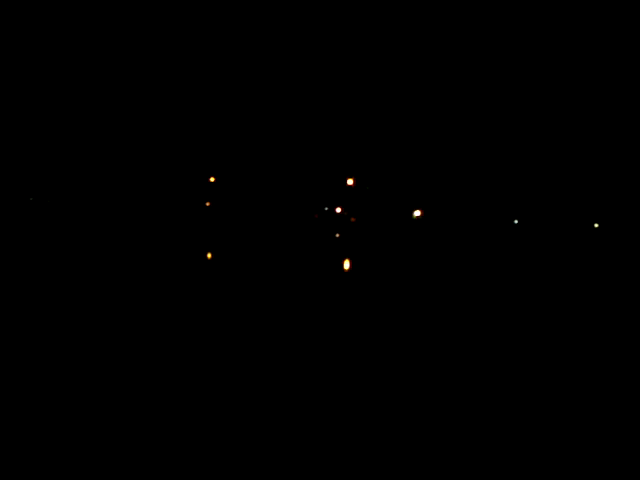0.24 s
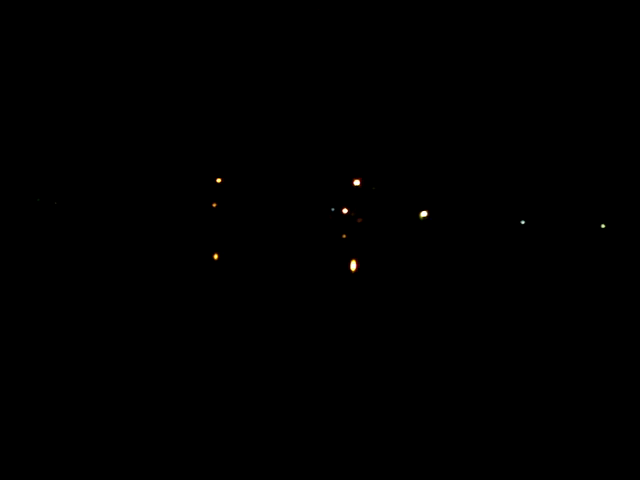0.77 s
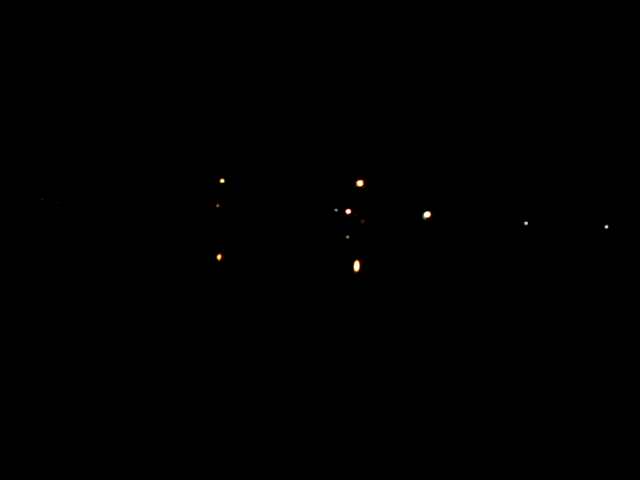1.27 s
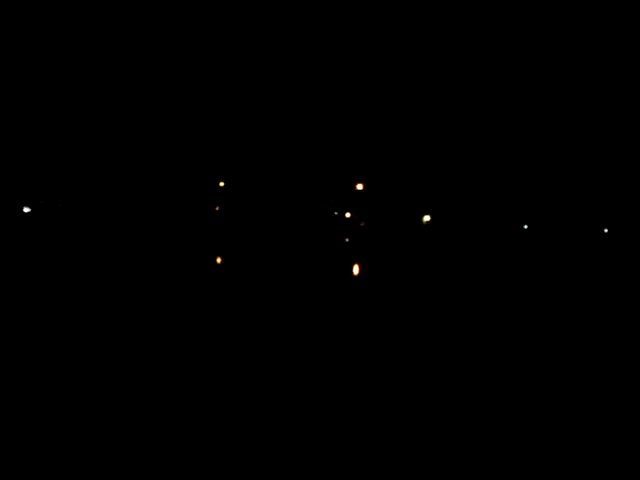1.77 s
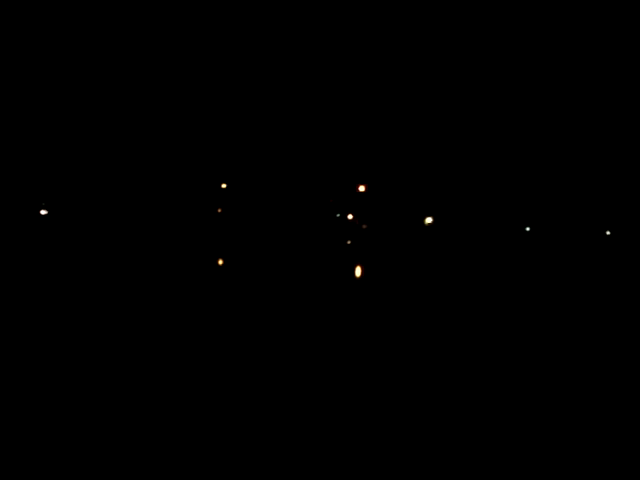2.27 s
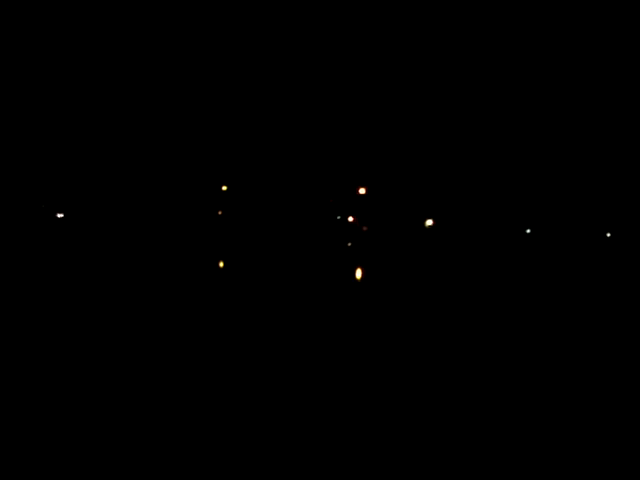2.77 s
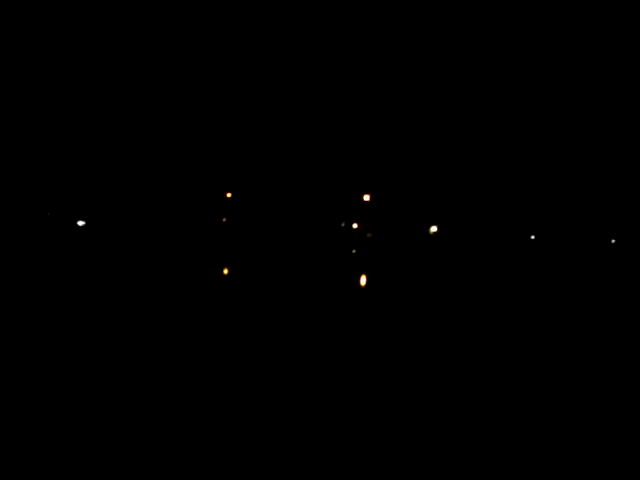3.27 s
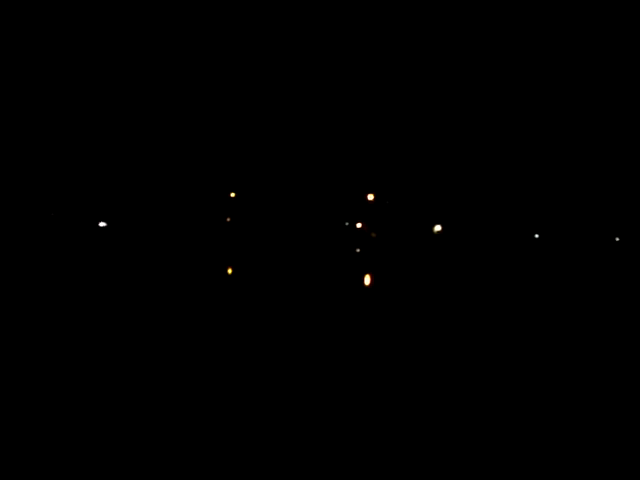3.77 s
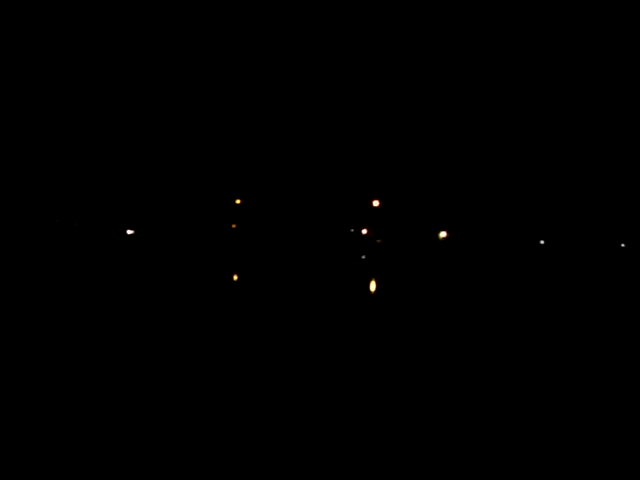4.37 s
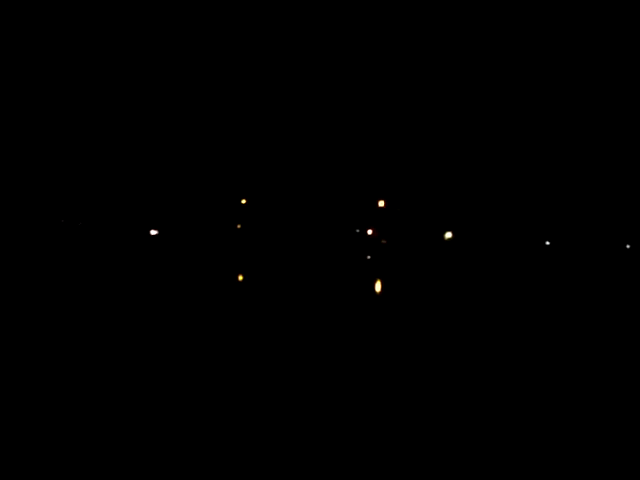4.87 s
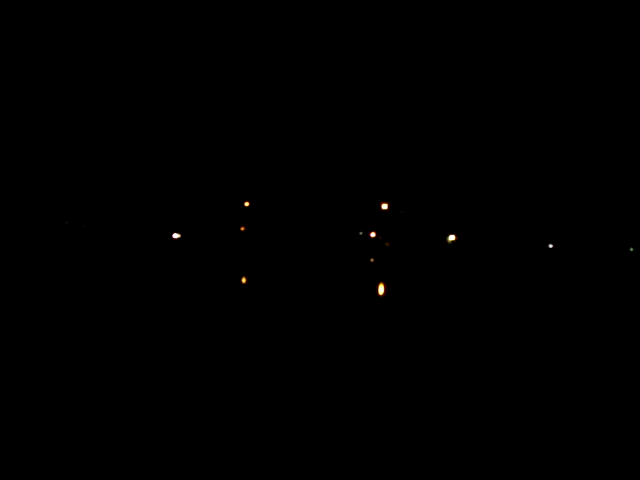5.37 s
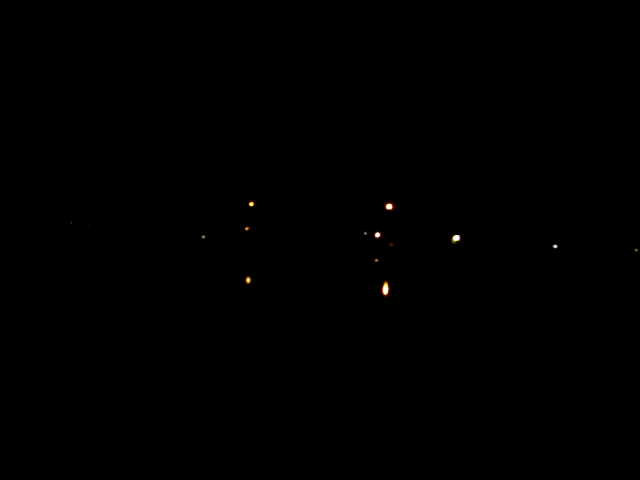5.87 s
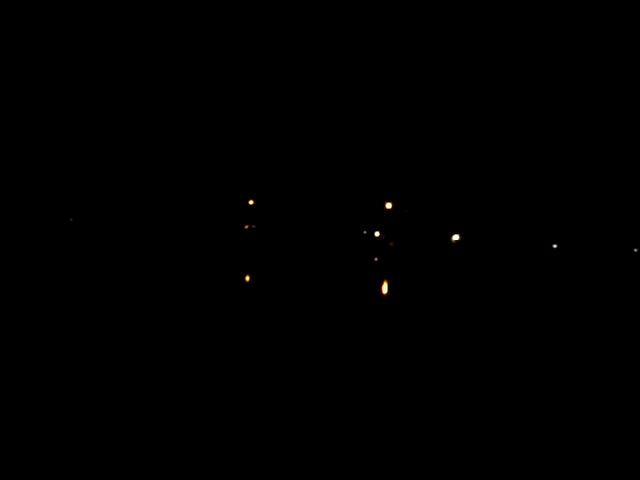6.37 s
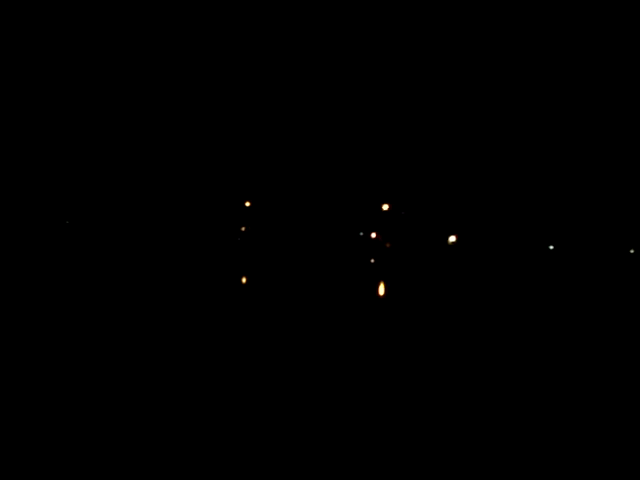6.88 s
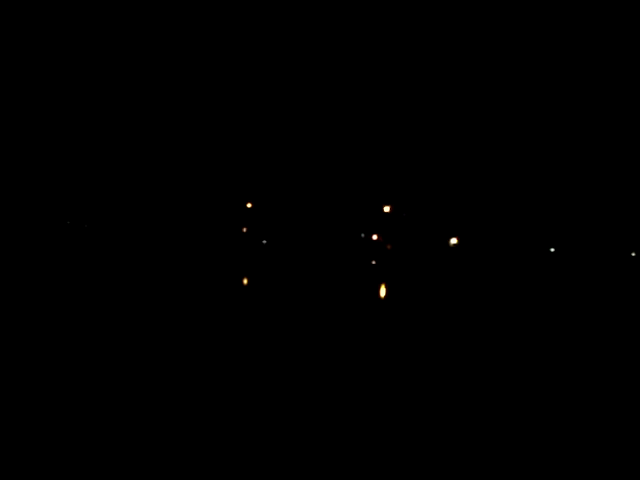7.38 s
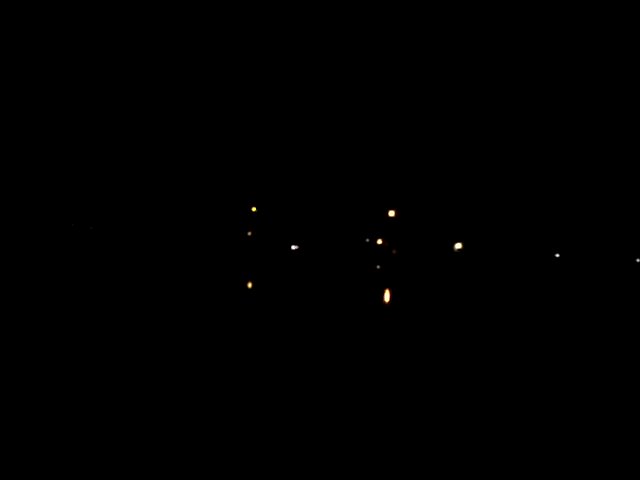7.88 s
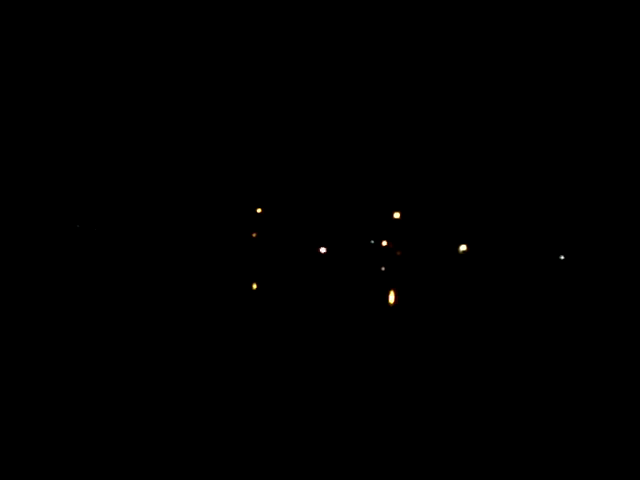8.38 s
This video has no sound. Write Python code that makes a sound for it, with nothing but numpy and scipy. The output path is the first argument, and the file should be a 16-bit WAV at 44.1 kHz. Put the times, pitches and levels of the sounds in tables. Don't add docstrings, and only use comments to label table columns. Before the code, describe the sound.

A dense, steady frog chorus from start to end. Two near callers repeat short, raspy, upward-bending quacks in separate rhythms; the right one pauses briefly after the middle, then resumes. Irregular bouts of lower, ringing pond frog chuckles fill the gaps. Many distant frogs shimmer in open-air scatter. Faint low car hum, tiny puffs of air and microphone hiss lie far beneath.

```python
import sys
import numpy as np
from scipy import signal
from scipy.fft import rfft, irfft
from scipy.io import wavfile
from scipy.ndimage import uniform_filter1d

SR = 44100
rng = np.random.default_rng(int(sys.argv[2]) if len(sys.argv) > 2 else 0)


def natural_amplitude(level_db):
    exponent = np.asarray(level_db, float) / 20
    return 10 ** exponent


def to_wav(s):
    ch = np.atleast_2d(s).T
    pcm = np.round(np.clip(ch, -1, 1) * 32767)
    wavfile.write(sys.argv[1], SR, pcm.astype(np.int16))


N = 381024

# (first pulse [s], pulse rate [Hz], pulses [count])
CALLS_AHEAD = [(0.1554, 202, 18), (0.4236, 210, 17), (0.7097, 211, 19), (1.1776, 198, 19),
               (1.4612, 208, 19), (1.7748, 205, 19), (2.0427, 212, 16), (2.3184, 210, 16),
               (2.5888, 207, 18), (2.8651, 207, 16), (3.1475, 211, 16), (3.4131, 205, 19),
               (3.7121, 202, 18), (3.9902, 207, 18), (4.2618, 206, 17), (4.5408, 209, 19), (4.846, 206, 19),
               (5.1381, 202, 16), (5.4697, 197, 18), (5.7727, 207, 18), (6.0527, 200, 19),
               (6.3265, 200, 19), (6.6182, 201, 16), (6.9093, 206, 18), (7.1811, 204, 19),
               (7.4693, 202, 18), (7.7521, 201, 17), (8.0358, 197, 19), (8.3387, 201, 16)]
CALLS_RIGHT = [(0.0208, 189, 16), (0.3172, 189, 18), (0.6034, 187, 15), (0.8842, 185, 15),
               (1.1546, 183, 16), (1.4258, 181, 15), (1.7382, 189, 17), (2.0382, 183, 16), (2.328, 181, 15),
               (2.625, 185, 16), (2.895, 181, 16), (3.1842, 183, 16), (3.4542, 181, 16), (3.7382, 183, 15),
               (4.0058, 177, 16), (4.3106, 185, 15), (4.5914, 179, 16), (4.8918, 179, 15),
               (5.1742, 179, 15), (5.459, 179, 15), (5.7934, 181, 17), (6.6774, 177, 16), (7.0262, 175, 16),
               (7.3346, 173, 15), (7.6174, 173, 17), (7.911, 175, 17), (8.199, 173, 16), (8.4894, 175, 16)]
# (multiple of cord tone [ratio], level [dB])
VOICE_AHEAD = [(0.998, -15.5), (1.999, 1), (2.3, -20), (2.55, -28), (3.002, -27.5), (3.25, -37), (4, -47.5),
               (5.998, -55)]
VOICE_RIGHT = [(1.001, -10), (2, -1.5), (2.35, -18), (2.6, -25), (3.001, -30.5), (4.001, -43),
               (6.001, -47.5)]


def near_frogs():
    calls_ahead = with_effort(CALLS_AHEAD, 1) + [0, 1, 0, 1]
    calls_right = with_effort(CALLS_RIGHT, 2)
    ahead = quacks(calls_ahead, 1549.6, glide=0.12, drawl=0.5, swell=5.9, fade=7.1, jitter_db=0.4)
    right = quacks(calls_right, 1542, glide=0.092, drawl=0.7, swell=6.5, fade=3.5, jitter_db=0.23)
    bell_ms = dict(rise_ms=1.1, fall_ms=1.0)
    return (pulses(*ahead, VOICE_AHEAD, **bell_ms, lead_us=22, shade_db=-1.0)
            + pulses(*right, VOICE_RIGHT, **bell_ms, lead_us=52, shade_db=-3.0))


# (time [s], frog ahead [dB], frog right [dB])
EFFORT = [(0, -22, -20.5), (.7, -20.5, -19.5), (1.4, -19.5, -19.5), (2.1, -18.5, -17), (2.8, -20, -19.5),
          (3.5, -21.5, -17.5), (4.2, -20.5, -19.5), (4.9, -19, -18.5), (5.6, -19, -18), (6.3, -19, -16),
          (7, -18.5, -18), (7.7, -18, -18.5), (8.1, -23, -20), (8.64, -20.5, -18.5)]


def with_effort(calls, column):
    s, rate_hz, count = np.transpose(calls)
    effort = np.array(EFFORT)
    effort_db = np.interp(s, effort[:, 0], effort[:, column])
    return np.transpose([s, effort_db, rate_hz, count])


def quacks(calls, cord_hz, glide, drawl, swell, fade, jitter_db, stray=0.008):
    glide_pulses, pitch_jitter, timing_jitter_s = 3.9, 0.004, 0.0001
    s, db, rate_hz, count = np.transpose(calls)[:, :, None]
    k = np.arange(22) + 0 * s
    luck = rng.standard_normal((len(s), 4, 22))
    gap_s = (1 + drawl * np.exp(-k / 2.5)) / rate_hz
    when_s = s + np.cumsum(gap_s, axis=1) - gap_s + timing_jitter_s * luck[:, 0]
    left = count - k
    shape = np.clip((k + 1) / swell, 0, 1) * np.clip(left / fade, 0, 1) ** 0.55
    climb = 1 - glide * np.exp(-k / glide_pulses)
    hz = cord_hz * (climb + pitch_jitter * luck[:, 1] + stray * luck[:, 3, :1])
    gain = shape * natural_amplitude(db + jitter_db * luck[:, 2])
    live = left > 0
    return when_s[live], hz[live], gain[live]


def pulses(s, hz, gain, voice, rise_ms, fall_ms, lead_us, shade_db):
    out = np.zeros((2, N))
    at = np.round(s * SR).astype(int)[:, None] + np.arange(-125, 200)
    ok = (at >= 0) & (at < N)
    for ch, sign in enumerate((0.5, -0.5)):
        t = at / SR - s[:, None] + sign * np.reshape(lead_us, (-1, 1)) * 1e-6
        bell = np.exp(-0.5 * (1000 * t / np.where(t < 0, rise_ms, fall_ms)) ** 2)
        turn = 2 * np.pi * hz[:, None] * t
        wave = 0
        for k, db in voice:
            shade = sign * shade_db * np.exp(-((k * hz.mean() - 3200) / 1300) ** 2)
            wave = wave + natural_amplitude(db + shade) * np.cos(k * turn)
        out[ch] = np.bincount(at[ok], (gain[:, None] * bell * wave)[ok], N)
    return out


# (frequency [Hz], density [dB per Hz])
RASP = [(900, -29.5), (1500, -6), (2400, 2), (5000, -17), (7300, -33.5), (8400, -40.5), (9300, -36.5),
        (10000, -60.5)]


def rasp(voices):
    strength = uniform_filter1d(uniform_filter1d(abs(voices), size=15), size=60)
    return strength * coloured(RASP)


# (first chuckle [s], chuckles [count], peak [dB], throat tone [Hz])
BOUTS = [(0.147, 4, -27, 1904), (0.575, 3, -28.5, 1984), (1.018, 3, -23, 2020), (1.38, 1, -31, 1960),
         (1.545, 1, -28.5, 1960), (1.953, 1, -26, 2080), (2.257, 1, -30, 1927), (2.52, 4, -26, 1870),
         (3.1, 1, -31.5, 1956), (3.335, 3, -32.5, 2016), (3.825, 3, -26.5, 1827), (4.161, 1, -26, 1896),
         (4.39, 6, -24.5, 1946), (5.316, 2, -30, 2080), (5.605, 1, -30, 1975), (5.755, 4, -30, 1890),
         (6.47, 2, -31, 2144), (6.845, 2, -30, 2010), (7.11, 2, -24.5, 1910), (7.363, 1, -21, 2087),
         (7.515, 5, -30.5, 1966), (8.065, 3, -28, 1975), (8.387, 1, -27, 1987), (8.531, 1, -31, 1920)]
# (multiple of throat tone [ratio], level [dB])
VOICE_POND = [(0.651, -13), (0.998, 2.5), (1.25, -10.5)]


def chuckles():
    chuckle_gap_s, swell_db, fade_db, throat_stray = 0.094, 2.1, 2.6, 0.02
    start_s, count, peak_db, throat_hz = np.transpose(BOUTS)[:, :, None]
    n = np.arange(6)
    live = n < np.round(count)
    stray = rng.standard_normal((len(BOUTS), 6))
    s = (start_s + chuckle_gap_s * n)[live][:, None]
    bout_db = peak_db - swell_db * np.maximum(2 - n, 0) - fade_db * np.maximum(n - 2, 0)
    db = bout_db[live][:, None]
    hz = (throat_hz * (1 + throat_stray * stray))[live][:, None]
    k = np.arange(5)
    luck = rng.standard_normal((len(s), 2, 5))
    when_s = s + 0.0051 + k / 135 + 0.0004 * luck[:, 0]
    gain = natural_amplitude(db - 3 - 1.3 * abs(k - 1) + 0.4 * luck[:, 1])
    return pulses(when_s.ravel(), (hz + 0 * k).ravel(), gain.ravel(), VOICE_POND,
                  rise_ms=1.0, fall_ms=1.6, lead_us=9, shade_db=-1.0)


# (time [s], tree frogs [dB], pond frogs [dB])
CROWD_EFFORT = [
    (0, -32, -39.5),
    (1, -33, -39.5),
    (2.6, -33, -40.5),
    (3.5, -33, -42),
    (4.7, -32.5, -39.5),
    (6.2, -33.5, -42.5),
    (7.4, -33.5, -39.5),
    (8.64, -33, -37),
]
# (multiple of cord tone [ratio], level [dB])
VOICE_CROWD = [(1, -12), (2, 1.5), (2.6, -24), (3.05, -31.5)]


def far_frogs():
    trees = crowd(count=22, period_s=0.29, rate_hz=185, length=17, cord_hz=1491.4, spread=0.046,
                  stray=0.027, voice=VOICE_CROWD, fall_ms=1.43)
    pond_voice = [(0.72, -0.5), (0.88, -7.5), (1.08, -0.5), (1.28, -2.5)]
    ponds = crowd(count=8, period_s=0.17, rate_hz=140, length=8, cord_hz=1792, spread=0.045,
                  stray=0.06, voice=pond_voice, fall_ms=2.1)
    trees_db, ponds_db = in_time(CROWD_EFFORT)
    return natural_amplitude(trees_db) * trees + natural_amplitude(ponds_db) * ponds


def crowd(count, period_s, rate_hz, length, cord_hz, spread, stray, voice, fall_ms):
    out = []
    for turn, own in enumerate(rng.standard_normal((count, 5))):
        s = np.arange(-turn / count, 60) * period_s * (1 + 0.012 * own[0])
        s = s + 0.015 * rng.standard_normal(len(s))
        own_db, own_rate_hz = 1.6 * own[1], rate_hz * (1 + 0.07 * own[2])
        calls = np.transpose([s, 0 * s + own_db, 0 * s + own_rate_hz, 0 * s + length])
        when_s, hz, gain = quacks(calls[s < N / SR], cord_hz * (1 + spread * own[3]), glide=0.12, drawl=0.5,
                                  swell=8.2, fade=2.7, jitter_db=1.0, stray=stray)
        out.append((when_s, hz, gain, 0 * hz + 11 + 14 * own[4]))
    when_s, hz, gain, lead_us = map(np.concatenate, zip(*out))
    return rms_one(pulses(when_s, hz, gain, voice, 0.75, fall_ms, lead_us, shade_db=-1.05))


def field(x, t60, alike):
    out = np.zeros((2, N + 2 * SR))
    hop = SR // 4
    t = np.arange(SR // 3) / SR
    fade = np.sin(np.pi * np.arange(2 * hop) / (2 * hop))
    padded = np.pad(x, ((0, 0), (hop, 2 * hop)))
    for i in range(0, N + hop, hop):
        mid, side = rng.standard_normal((2, len(t))) * natural_amplitude(-60 * t / t60) * (t > 0.002)
        tail = mid + np.sqrt(1 - np.clip(alike, 0, 1)) * side * [[1], [-1]]
        tail = tail / np.sqrt(np.sum(mid ** 2))
        wet = signal.fftconvolve(padded[:, i:i + 2 * hop] * fade, tail, axes=1)
        out[:, i:i + wet.shape[1]] += wet
    return out[:, hop:hop + N]


# (time [s], firing rate [Hz], nearness [dB], load [dB])
CAR = [
    (0, 116.3, -2.5, -2),
    (1.5, 122.7, -2, -1.5),
    (2.5, 125, -0.5, 3),
    (3.7, 124.5, 0, 3.5),
    (4.3, 106.2, 0.5, 0.5),
    (6, 100.4, 0.5, 0),
    (7.2, 99.1, 0.5, 5.5),
    (8.15, 96.8, 2, 2.5),
    (8.35, 95.3, 3, 10),
    (8.64, 97, 3.5, 6.5),
]
CAR_ORDERS = [1, 2, 3, 5]
# (level [dB], share of load heard [ratio])
ORDER_LEVELS = [(-78.5, 0.05), (-78, 0.25), (-75, 0.55), (-74.5, 1.9)]
# (frequency [Hz], density [dB per Hz])
ROAD = [(60, -71), (109, -37.5), (172, -31.5), (464, -16.5), (906, -12.5), (1150, -11.5), (2500, -44.5)]


def car():
    hz, near_db, load_db = in_time(CAR)
    turn = 2 * np.pi * np.cumsum(hz) / SR
    knots = np.arange(0, N + SR, SR // 6)
    out = natural_amplitude(-51.5 + 0.9 * near_db) * coloured(ROAD)
    for k, (db, share) in zip(CAR_ORDERS, ORDER_LEVELS):
        waver = np.interp(np.arange(N), knots, rng.standard_normal(len(knots)))
        gain = natural_amplitude(db + near_db + share * load_db + 2.5 * waver)
        out = out + gain * np.sin(k * turn + 0.6 * waver + np.array([[0.3], [-0.3]]))
    return out


# (time [s], level [dB])
PUFFS = [(.12, -87), (1.23, -82.5), (1.42, -86), (2.09, -80), (2.45, -79), (2.9, -86), (3.34, -82),
         (3.75, -85), (4.02, -87.5), (4.6, -88), (4.91, -84), (5.05, -82.5), (5.27, -78.5), (5.63, -83),
         (5.97, -78), (6.83, -88)]
# (frequency [Hz], density [dB per Hz])
WIND = [(20, -9.5), (40, -10), (70, -1.5), (110, -1), (200, -17.5), (400, -47.5)]


def breeze():
    calm_db, puff_s = -94.5, 0.05
    t = np.arange(0, N + 400, 400) / SR
    gain = natural_amplitude(calm_db) + sum(natural_amplitude(db) * np.exp(-abs(t - s) / puff_s) for s, db in PUFFS)
    return np.interp(np.arange(N) / SR, t, gain) * coloured(WIND)


# (frequency [Hz], density [dB per Hz])
HISS = [(2500, -4.5), (5000, -5), (6800, -2.5), (7400, -13), (8600, -8), (9000, -1.5), (12800, 0),
        (14000, -3.5)]


def hiss():
    return natural_amplitude(-71.5) * coloured(HISS)


# (frequency [Hz], likeness [ratio])
LIKENESS = [(30, .45), (120, 0.3), (400, 0.89), (1500, 0.81), (3000, 0.89), (6000, 0.085), (12000, 0.01)]


def coloured(spectrum):
    hz = np.maximum(np.fft.rfftfreq(N, 1 / SR), 10)
    mid, side = rfft(rng.standard_normal((2, N))) * natural_amplitude(at_hz(spectrum, hz))
    alike = np.clip(at_hz(LIKENESS, hz), 0, 1)
    return rms_one(irfft(np.sqrt(1 + alike) * mid + np.sqrt(1 - alike) * side * [[1], [-1]], N))


def at_hz(points, hz):
    point_hz, value = np.transpose(points)
    return np.interp(np.log(hz), np.log(point_hz), value)


def in_time(rows):
    s, *columns = np.transpose(rows)
    return [np.interp(np.arange(N) / SR, s, c) for c in columns]


def rms_one(x):
    return x / np.sqrt(np.mean(x ** 2) + 1e-20)


def scene():
    near = near_frogs() + chuckles()
    far = far_frogs()
    near = near + natural_amplitude(-14.5) * rasp(near)
    far = far + natural_amplitude(-11) * rasp(far)
    near_echo = natural_amplitude(-20) * field(near, t60=0.25, alike=0.9)
    far_echo = natural_amplitude(-4) * field(far, t60=1.0, alike=0.95)
    small_throats = signal.butter(6, 1130, "high", fs=SR, output="sos")
    frogs = signal.sosfilt(small_throats, near + near_echo + far + far_echo)
    return frogs + (breeze() + car()) * natural_amplitude([[-0.35], [0.35]]) + hiss()


def top_cut(x):
    return signal.sosfilt(signal.butter(12, 13670, fs=SR, output="sos"), x)


def record(dry):
    size = N + SR
    hz = np.fft.rfftfreq(size, 1 / SR)
    gap_db = -30 * np.exp(-0.5 * ((hz - 7880) / 130) ** 2) - 9 * np.exp(-0.5 * ((hz - 8000) / 400) ** 2)
    top_db = -40 * np.clip((hz - 13400) / 100, 0, 1)
    mix = irfft(rfft(dry, size) * natural_amplitude(gap_db + top_db), size)[:, :N]
    return top_cut(mix)


dry = scene()
out = record(dry)
to_wav(out)
```